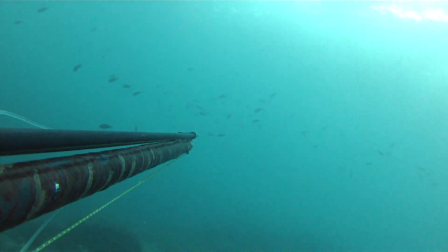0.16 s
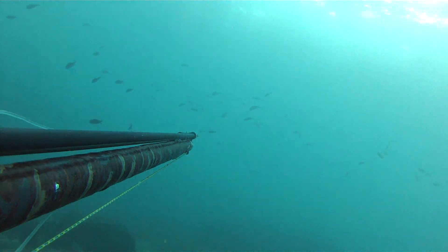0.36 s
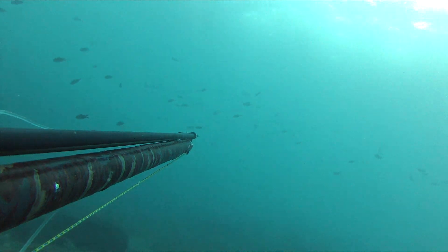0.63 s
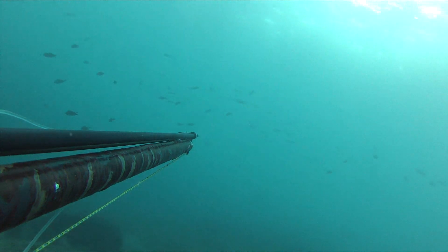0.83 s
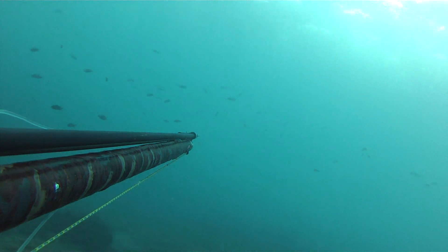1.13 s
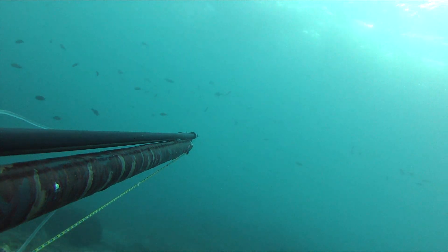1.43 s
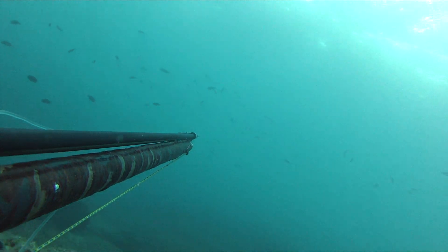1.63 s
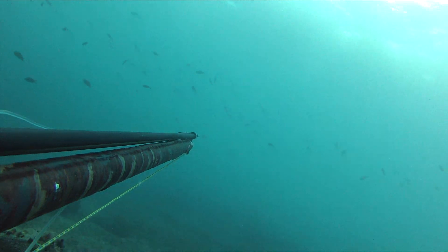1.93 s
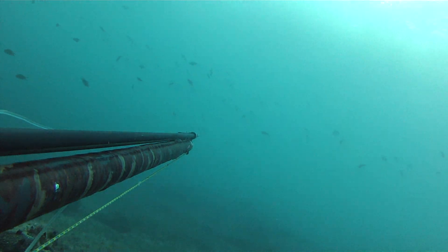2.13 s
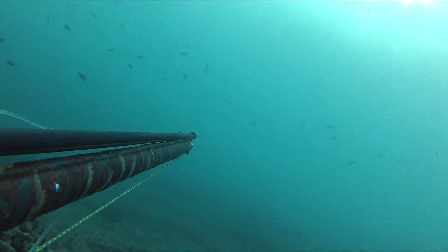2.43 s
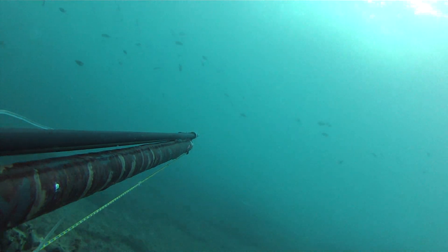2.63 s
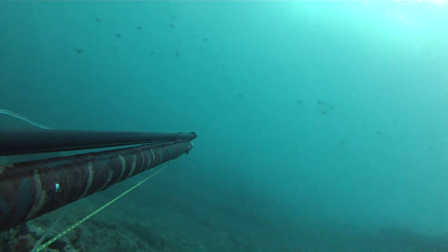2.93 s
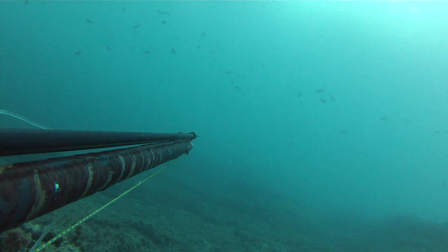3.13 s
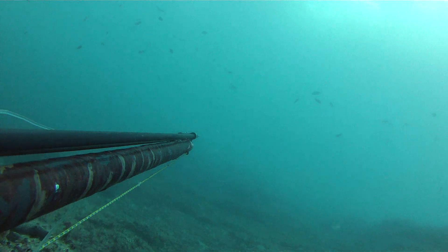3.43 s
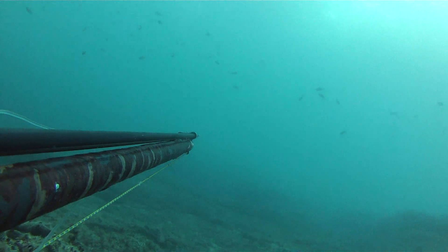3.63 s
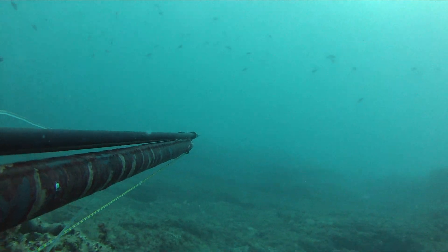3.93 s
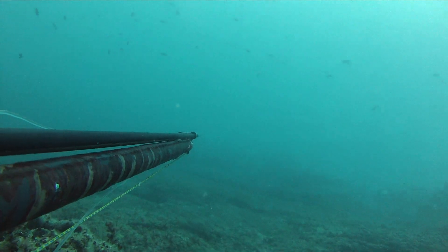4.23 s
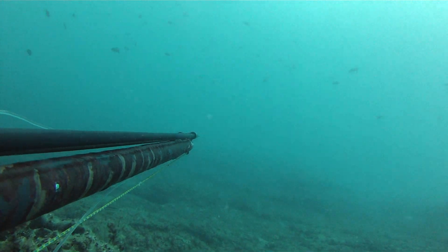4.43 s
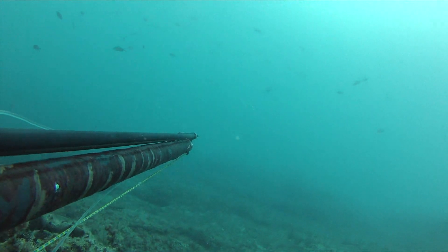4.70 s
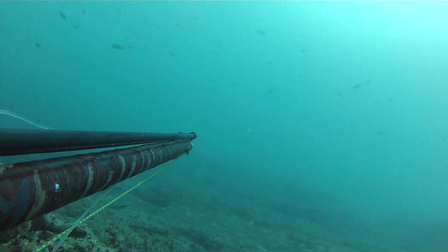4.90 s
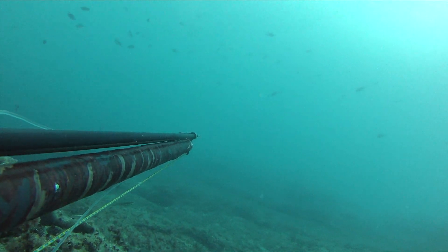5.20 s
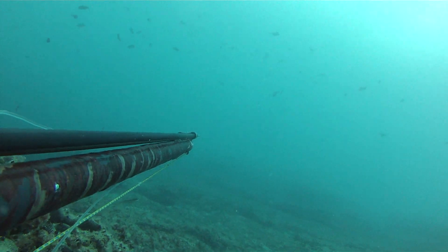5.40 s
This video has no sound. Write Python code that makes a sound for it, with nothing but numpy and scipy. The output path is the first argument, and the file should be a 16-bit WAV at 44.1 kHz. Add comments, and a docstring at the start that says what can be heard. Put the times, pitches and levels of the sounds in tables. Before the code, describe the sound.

Underwater over a rocky seabed, heard from inside a diver's camera housing. Distant shrimp make a fine, constant crackle, with sharp closer snaps standing out at random. Gear rubs and knocks on the housing in muffled, hollow surges, loudest near the middle, over a faint low rumble of passing water. Toward the end the rubbing dies down and trapped air gives a few small, soft glugs.

```python
"""A diver glides over a rocky seabed with a camera in a watertight housing. From the start water
rumbles past, gear rubs on the housing and countless far shrimp crackle as their claws' bubbles collapse.
Close snaps soon stand out, and knocks ring the housing in muffled surges, loudest near the middle.
Later, trapped air gives a few small glugs with a soft ring. A faint hiss lies under it all."""
import sys
import numpy as np
from scipy import signal
from scipy.fft import rfft, irfft
from scipy.io import wavfile

SR = 44100
rng = np.random.default_rng(int(sys.argv[2]) if len(sys.argv) > 2 else 0)


def generate_wav(signal):
    """Clip the signal to [-1, 1] and save it as 16-bit WAV at the path in sys.argv[1]."""
    frames = np.transpose(np.atleast_2d(signal))
    scaled = np.clip(frames, -1, 1) * 32767
    pcm = np.round(scaled).astype(np.int16)
    wavfile.write(sys.argv[1], SR, pcm)


N = 245195
TIME = np.arange(N) / SR
BRIEF = TIME[:8192]   # time within one snap, knock or glug


def from_db(db):
    """Amplitude ratio of a level in decibels."""
    return 10 ** (np.asarray(db) / 20)


def rms_one(x):
    """Scale to rms 1."""
    return x / np.sqrt(np.mean(x ** 2) + 1e-20)


def peak_one(x):
    """Scale to peak 1."""
    return x / np.abs(x).max()


def add(track, start_s, sound):
    """Superposition: a sound adds to the track from its start time."""
    at = max(round(start_s * SR), 0)
    track[at:at + len(sound)] += sound[:N - at]


def cut(x, hz, kind, order=2):
    """Butterworth filter."""
    return signal.sosfilt(signal.butter(order, hz, kind, fs=SR, output="sos"), x)


def drift(per_s):
    """Slow random variation of rms 1."""
    knots = rng.standard_normal(4000)
    return rms_one(np.interp(TIME * per_s, np.arange(len(knots)), knots))


def response(spectrum, resonances=(), size=8192):
    """Minimum-phase impulse response of a broad spectrum with resonant peaks on top."""
    hz = np.fft.rfftfreq(size, 1 / SR) + 1
    points = np.array(spectrum)
    db = np.interp(np.log(hz), np.log(points[:, 0]), points[:, 1])
    for centre, width, lift in resonances:
        db = db + lift / (1 + (2 * (hz - centre) / width) ** 2)
    cepstrum = irfft(np.log(from_db(db)))
    cepstrum[1:size // 2] *= 2   # folding onto positive time makes the response causal
    cepstrum[size // 2 + 1:] = 0
    return irfft(np.exp(rfft(cepstrum)))[:size // 2]


def through(x, impulse):
    """Convolution with an impulse response."""
    return signal.fftconvolve(x, impulse)[:len(x)]


def clicks(per_s, spread_db, limit):
    """Poisson impulses, many weak and few strong, spanning limit times spread_db."""
    sizes = from_db(spread_db * np.minimum(rng.exponential(1, N), limit)) * rng.choice([-1, 1], N)
    return sizes * (rng.random(N) < per_s / SR)


def burst(decay_s):
    """A cluster of random arrivals in exponential decay."""
    return rng.standard_normal(len(BRIEF)) * np.exp(-BRIEF / decay_s)


def registers(x, thud_top_hz=405, ring_top_hz=800):
    """Split the housing's vibration into low thud, main ring and upper rasp, each at rms 1."""
    return (rms_one(cut(x, thud_top_hz, "low", order=5)),
            rms_one(cut(x, [thud_top_hz, ring_top_hz], "band", order=3)),
            rms_one(cut(x, ring_top_hz, "high", order=5)))


def water_flow(gain_db=-2.0):
    """Turbulence: passing eddies press on the housing with a low rumble."""
    # Course of the flow. Each row: time in seconds, level in dB before the gain.
    surges = [(0.0, -68.5), (0.79, -82), (0.88, -65), (1.04, -74), (1.5, -76), (1.58, -59), (1.63, -73),
              (2.28, -69), (2.46, -63), (2.6, -57), (2.79, -55), (3.05, -63), (3.42, -95), (3.45, -59),
              (3.79, -74), (3.87, -56), (4.54, -72), (5.56, -77.5)]
    # Spectrum of the eddies. Each row: frequency in Hz, relative level in dB.
    eddy_spectrum = [(12, -6), (28, 0), (40, -4), (56, -5), (72, -12), (100, -17), (300, -45)]
    level_db = np.interp(TIME, *np.transpose(surges))
    rumble = rms_one(through(rng.standard_normal(N), response(eddy_spectrum)))
    return from_db(level_db + gain_db) * rumble


def stroke(start_s, attack_s, hold_s, release_s=0.025, trail_db=-10, trail_s=0.11):
    """Envelope of one rub: linear attack, hold, then a quick exponential release and a faint trail."""
    swell = np.clip((TIME - start_s) / attack_s, 0, 1)
    after = np.maximum(TIME - start_s - attack_s - hold_s, 0)
    return swell * np.maximum(np.exp(-after / release_s), from_db(trail_db) * np.exp(-after / trail_s))


def rubbing(shell, judder_db=0.5):
    """Stick-slip friction: tiny slips of the gear come in clumps and keep the housing ringing."""
    # Strokes of gear on the housing. Each row: start, attack and hold in seconds,
    # ring level in dB, thud and rasp in dB relative to the ring.
    strokes = [(0.0, 0.0034, 0.19, -52.5, -8, -1.5), (0.589, 0.012, 0.0085, -42.5, -29, -9),
               (0.63, 0.021, 0.028, -40.5, -20, -6.5), (0.76, 0.012, 0.076, -58.5, -5, 0.5),
               (1.529, 0.014, 0.052, -53.5, 2, -10), (1.62, 0.025, 0.18, -59, -5, -5),
               (1.81, 0.017, 0.23, -53, -1, -0.5), (2.08, 0.025, .28, -60, -2.5, -5),
               (2.39, 0.079, 0.093, -44.5, 0, 1), (2.55, 0.036, 0.096, -40.5, -10, 2.5),
               (2.702, 0.016, 0.15, -46.5, -15, -9), (3.03, 0.022, 0.19, -62, -6, -8.5),
               (3.401, 0.043, 0.013, -48.5, -4, -2), (3.46, 0.021, 0.048, -39.5, -22, -3),
               (3.582, 0.0099, 0.12, -49, -9, -12), (3.808, .035, 0.013, -40, -9.5, 1),
               (3.88, 0.013, 0.042, -42, -4, -5), (3.94, 0.0092, 0.14, -69.5, 9, -8),
               (4.15, 0.02, 0.095, -57.5, -5.5, -6), (4.26, 0.018, 0.084, -54, -1.5, -4)]
    # Gear stirring between strokes: levels of thud, ring and rasp in dB.
    resting_db = (-86, -79, -89.5)
    slips = clicks(per_s=2200, spread_db=2.0, limit=1.08) * from_db(judder_db * drift(per_s=64))
    power = np.outer(from_db(resting_db) ** 2, np.ones(N))
    for start_s, attack_s, hold_s, ring_db, thud_rel, rasp_rel in strokes:
        colour = from_db([ring_db + thud_rel, ring_db, ring_db + rasp_rel])
        power += np.outer(colour ** 2, stroke(start_s, attack_s, hold_s) ** 2)
    return np.sum(np.sqrt(power) * registers(through(slips, shell)), axis=0)


def far_shrimp(resonances, crackle_db=-62, fizz_db=-61.5, smear_s=0.0004, tail_s=0.0097):
    """Multipath propagation smears snaps at middle distance; countless farther ones merge into fizz."""
    # Spectrum of distant snaps. Each row: frequency in Hz, relative level in dB.
    far_spectrum = [(40, 0), (250, 10.5), (500, 14), (800, 8), (1200, 10), (1750, 2), (2500, 1),
                    (4500, -3.5), (7000, -3), (9000, -6.5), (12000, -10.5), (16000, -39)]
    wall = response(far_spectrum, resonances)
    paths = np.exp(-BRIEF / smear_s) + 0.046 * np.exp(-BRIEF / tail_s)
    crackle = np.zeros(N)
    for hz in np.geomspace(2800, 9500, 5):
        power = through(clicks(per_s=30, spread_db=5.5, limit=2.8) ** 2, paths)
        arrivals = np.sqrt(np.abs(power)) * rng.standard_normal(N)
        crackle += cut(arrivals, [hz / np.sqrt(2), hz * np.sqrt(2)], "band", order=1)
    fizz = through(clicks(per_s=4000, spread_db=4.0, limit=2.7), wall)
    return from_db(crackle_db) * rms_one(through(crackle, wall)) + from_db(fizz_db) * rms_one(fizz)


def stray_snaps(count=28, mean_db=-38.5, spread_db=5.2, centre_hz=5830, octaves=0.27, rocks_db=-5.5):
    """Independent sources: rows for fainter shrimp a little further off, snapping at random."""
    when, faintness, pitch = rng.random((count, 3)).T
    span = np.sqrt(12)   # width of a uniform distribution with standard deviation 1
    strength_db = mean_db - spread_db * span * (faintness - 0.5)
    hz = centre_hz * 2 ** (octaves * span * (pitch - 0.5))
    return np.transpose([when * TIME[-1], strength_db, hz, np.full(count, rocks_db)])


def near_shrimp(resonances, crack_s=0.0008, crack_gain_db=0.5, scatter_s=0.0068, tail_s=0.028, tail_db=-11):
    """Cavitation: a claw's bubble collapses with a crack, which rocks and surface then scatter."""
    # Close snaps. Each row: start in seconds, strength in dB, centre in Hz, extra rock scatter in dB.
    snaps = [(0.115, -37.5, 7200, -20), (0.2377, -26, 5500, -1), (0.2847, -26.5, 3600, 0.5),
             (0.41, -49.5, 5300, -0.5), (0.596, -42.5, 4020, -0.5), (0.615, -41, 2380, 2.5),
             (0.7127, -34, 5540, -4), (0.9108, -43, 3860, -7), (1.0867, -38.5, 3040, -8),
             (1.159, -36, 4000, -2), (1.254, -26, 3770, 1), (1.3162, -49, 5650, -1.5),
             (1.3343, -41, 5700, -1.5), (1.3721, -30, 2750, -2), (1.6403, -38.5, 6800, -3.5),
             (1.7536, -28.5, 3840, 5.5), (1.8729, -50, 7650, 2.5), (2.1172, -41.5, 2730, -2),
             (2.1803, -40, 4200, 1), (2.3035, -41, 2900, 2.5), (2.3084, -17.5, 3070, 4),
             (2.3189, -20.5, 3500, -5), (2.3252, -26, 4230, -1), (2.5157, -36, 6210, -11.5),
             (2.8903, -29.5, 3600, -11), (3.0174, -30, 2940, -5), (3.1936, -50, 3850, 0.5),
             (3.2641, -34, 2700, -3), (3.2756, -34, 3520, 0.5), (3.2836, -35, 5710, 1),
             (3.4848, -37, 3500, 2), (3.7614, -50, 6150, 4), (3.8437, -45, 2230, 1),
             (3.9907, -37.5, 4260, -15), (4.0871, -44, 3800, -1), (4.1528, -37.5, 3930, -0.5),
             (4.1818, -31, 4560, -4), (4.2863, -40, 2140, -1.5), (4.4062, -35, 6400, -2.5),
             (4.5188, -35.5, 3700, 0.5), (4.5451, -38.5, 4170, -1), (4.627, -48, 3700, -1.5),
             (4.8617, -25, 3800, 4), (5.0174, -43.5, 2210, 0.5), (5.1139, -32, 6500, -1.5),
             (5.1262, -36, 4250, -1), (5.168, -48, 3860, 6.5), (5.3272, -37, 2800, -1),
             (5.359, -38.5, 3750, 1), (5.3724, -41, 5200, 6)]
    # Spectrum of close snaps. Each row: frequency in Hz, relative level in dB.
    near_spectrum = [(40, -21), (300, -41), (800, -1.5), (1200, 14.5), (1750, 6), (2400, 7), (3800, 4.5),
                     (6500, -0.5), (7800, -3.5), (10500, -12.5), (13000, -28), (16000, -4)]
    wall = response(near_spectrum, resonances)
    typical_snap_db, typical_scatter_db = -32, -57.5
    out = np.zeros(N)
    for start_s, strength_db, hz, rocks_db in [*snaps, *stray_snaps()]:
        broad = cut(wall, [hz / 1.9, hz * 1.9], "band")
        narrow = cut(wall, [hz / 1.09, hz * 1.09], "band", order=1)
        tint = broad + 1.3 * narrow
        crack = peak_one(through(burst(crack_s), tint))
        scatter = rms_one(through(burst(scatter_s) + from_db(tail_db) * burst(tail_s), tint))
        # Scatter follows strength only in part, so fainter snaps sound more diffuse.
        scatter_db = typical_scatter_db + 0.35 * (strength_db - typical_snap_db) + rocks_db
        add(out, start_s, from_db(strength_db + crack_gain_db) * crack + from_db(scatter_db) * scatter)
    return out


def knocks(shell, hard_s=0.00081, soft_s=0.00288, hard_rasp_db=-6.0, soft_rasp_db=-9.0):
    """Impulsive excitation: a short pulse of force rings the housing brightly, a longer one dully."""
    # Knocks on the housing, and the soft ring of the late glugs.
    # Each row: time in seconds, peak in dB, thud and rasp in dB relative to the ring.
    pulses = [(0.613, -37, -39, -26), (0.654, -29.5, -40, -9.5), (0.676, -34.5, -11, -23),
              (0.738, -39.5, -20, -35), (0.848, -30, 4, 5.5), (0.882, -35, -2, 0), (0.907, -38.5, -10, -10),
              (1.195, -39, -40, -7.5), (1.343, -42, -17, -35), (1.474, -37.5, -8, 0.5),
              (1.542, -32, 7.5, 16.5), (1.823, -29.5, -9, -3), (2.468, -16, -5.5, 5.5),
              (2.587, -22.5, -20, 6), (2.657, -18, -15, 0), (2.678, -17, -34, 3), (2.7, -20, -3, 9.5),
              (2.727, -22.5, 1, 9), (2.760, -13.5, -10.5, -0.5), (2.785, -29, 7, 7), (2.819, -25, -3, -2),
              (3.075, -41.5, -11, -20), (3.525, -29.5, -40, -10.5), (3.634, -34.5, -13, -33),
              (3.669, -35.5, -18, -13), (3.744, -36.5, -24, -23), (3.881, -27.5, -23, -6),
              (4.579, -43, -22, -8.5), (4.849, -38.5, -19, -4), (5.061, -38, -15, 7),
              (5.288, -45.5, -25, -33), (5.34, -38, -22, -9)]
    out = np.zeros(N)
    for time_s, peak_db, thud_rel, rasp_rel in pulses:
        contact_s = np.interp(rasp_rel, [soft_rasp_db, hard_rasp_db], [soft_s, hard_s])
        force = BRIEF ** 2 * burst(contact_s)   # builds up and lets go again
        thud, ring, rasp = registers(through(force, shell))
        vibration = from_db(thud_rel) * thud + ring + from_db(rasp_rel) * rasp
        add(out, time_s - contact_s, from_db(peak_db) * peak_one(vibration))
    return out


def glugs(shell, glide_s=0.0021, swell_s=0.0027):
    """Bubble resonance: trapped air shifts against the housing, its pitch dropping as the pocket widens."""
    # Air pockets. Each row: start in seconds, peak in dB, final pitch in Hz.
    pockets = [(3.136, -60, 452), (4.577, -42.5, 302), (4.67, -50, 166), (4.711, -44.5, 302),
               (4.787, -41, 246), (5.058, -41.5, 260), (5.339, -40, 310)]
    out = np.zeros(N)
    for start_s, peak_db, final_hz in pockets:
        pitch = final_hz * (1 + np.exp(-BRIEF / glide_s))   # falls an octave
        throb = BRIEF * np.exp(-BRIEF / swell_s) * np.sin(2 * np.pi * np.cumsum(pitch) / SR)
        add(out, start_s, from_db(peak_db) * peak_one(through(throb, shell)))
    return out


def scene():
    """Structural resonance: the housing's modes colour all but the rumble, alike in both channels."""
    # Modes of the housing. Each row: centre and width in Hz, lift in dB for contact,
    # lift in dB for waterborne sound.
    modes = [(124, 36, 6, 0), (208, 30, 4, 1), (315, 30, 9, 4), (490, 55, 9, 3), (578, 75, 15, 4),
             (625, 65, 7, 10), (946, 32, 7, 6), (1055, 45, 11, 0), (1185, 110, 6, 7), (1258, 55, 13, 2),
             (1345, 90, 9, 4), (2000, 90, 9, 7), (2195, 110, 6, 7), (2900, 260, 8, 6), (3580, 260, 9, 6),
             (4250, 380, 5, 7), (5300, 480, 5, 5), (6220, 350, 6, 7), (6900, 300, 3, 5)]
    # Spectrum of contact with the housing. Each row: frequency in Hz, relative level in dB.
    contact_spectrum = [(40, -60), (85, -8.5), (130, 2), (300, 0.5), (420, -2.5), (620, 0.5), (790, -8.5),
                        (1200, -4), (1600, -9), (2500, -24), (4000, -32), (7000, -39), (16000, -68)]
    touched = [(hz, width, lift) for hz, width, lift, _ in modes]
    immersed = [(hz, width, lift) for hz, width, _, lift in modes]
    shell = response(contact_spectrum, touched)
    shrimp = near_shrimp(immersed) + far_shrimp(immersed)
    return np.tile(shrimp + rubbing(shell) + knocks(shell) + glugs(shell) + water_flow(), (2, 1))


def record(dry, shared_hiss_db=-71.5, own_hiss_db=-74.0, cutoff_hz=15300):
    """Noise floor: a faint hiss, partly common to both channels; a steep low-pass limits the bandwidth."""
    # Spectrum of a faint hiss, different in each channel. Each row: frequency in Hz, relative level in dB.
    hiss_spectrum = [(30, 4), (120, -10), (300, 2.5), (600, 2), (1200, -5.5), (4000, -6), (8000, 3),
                     (15000, 3)]
    own = np.array([rms_one(through(w, response(hiss_spectrum))) for w in rng.standard_normal((2, N))])
    hiss = from_db(shared_hiss_db) * rng.standard_normal(N) + from_db(own_hiss_db) * own
    low_pass = signal.ellip(12, 0.1, 80, cutoff_hz, fs=SR, output="sos")
    return signal.sosfilt(low_pass, dry + hiss)


dry = scene()
out = record(dry)
generate_wav(out)
```